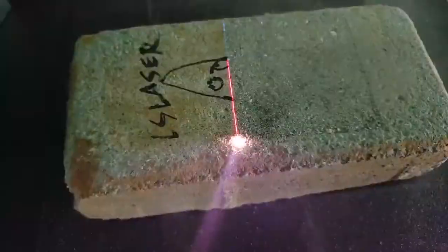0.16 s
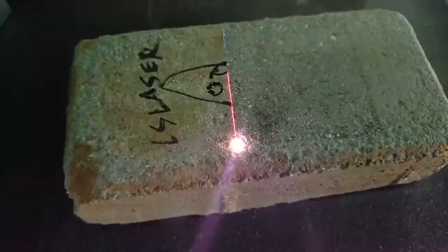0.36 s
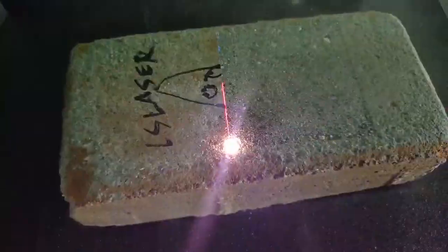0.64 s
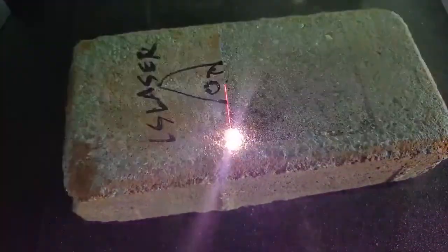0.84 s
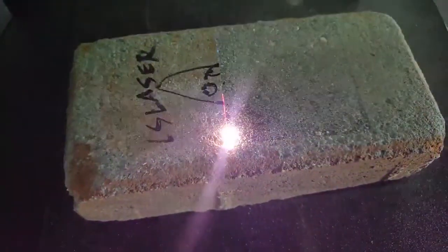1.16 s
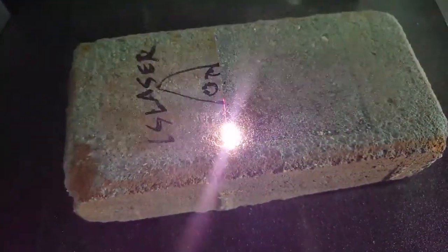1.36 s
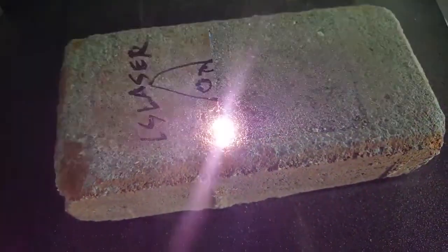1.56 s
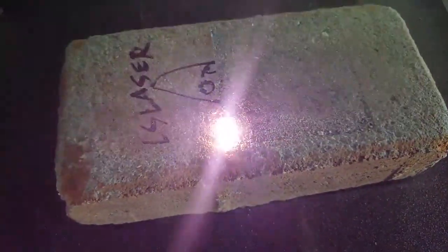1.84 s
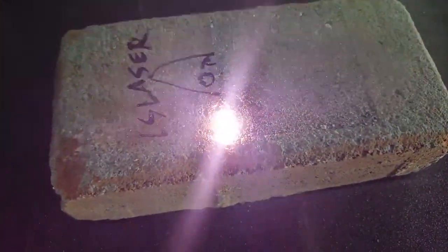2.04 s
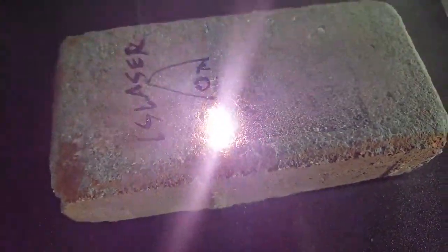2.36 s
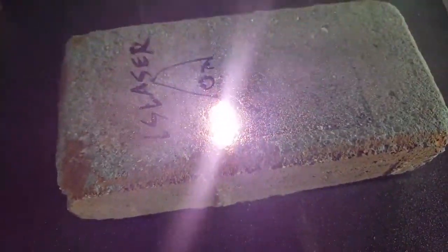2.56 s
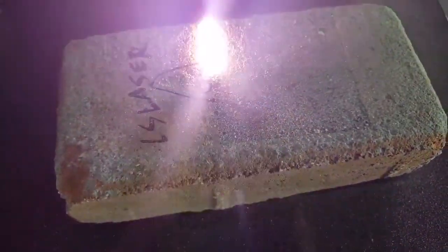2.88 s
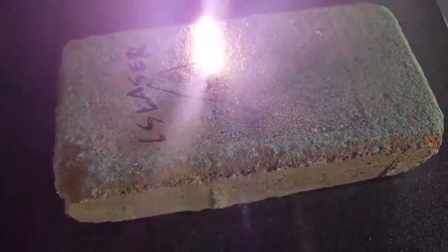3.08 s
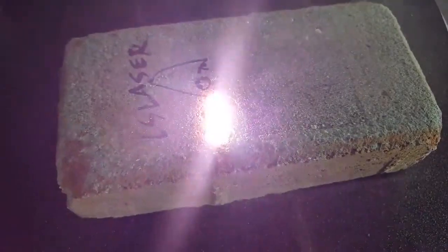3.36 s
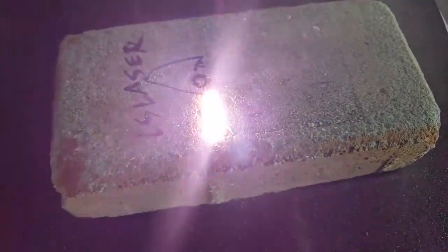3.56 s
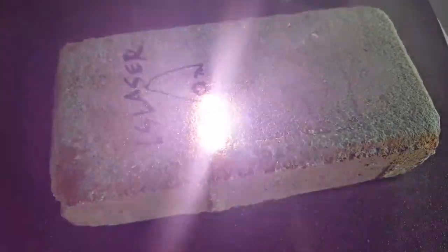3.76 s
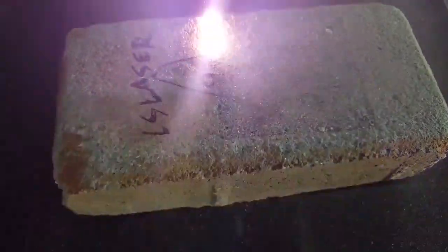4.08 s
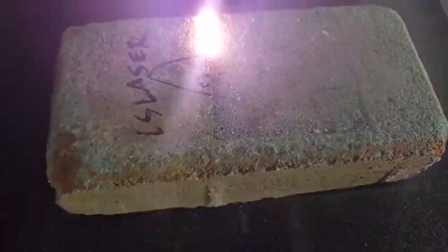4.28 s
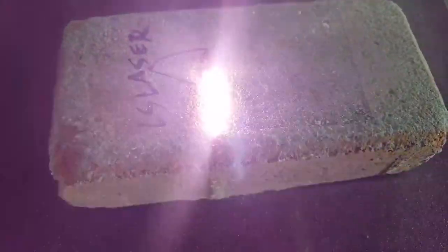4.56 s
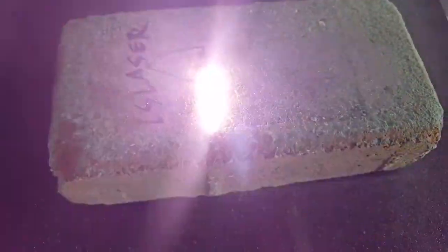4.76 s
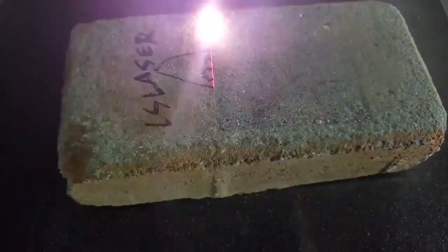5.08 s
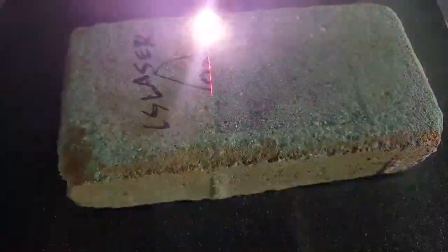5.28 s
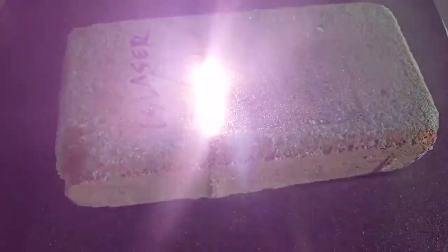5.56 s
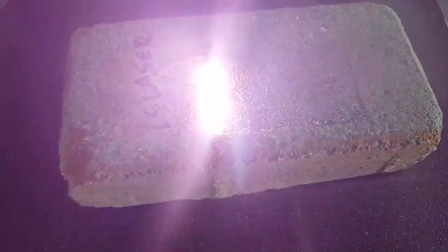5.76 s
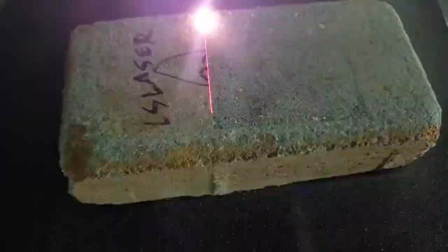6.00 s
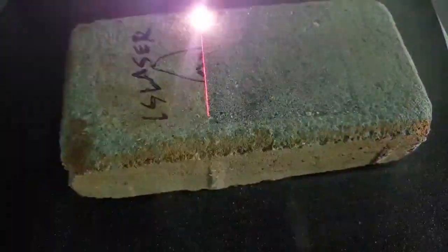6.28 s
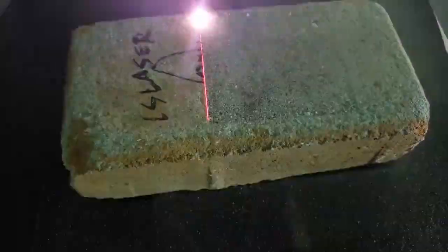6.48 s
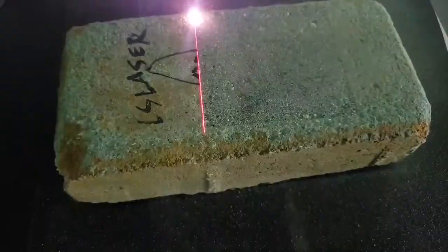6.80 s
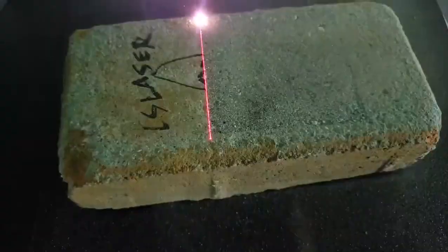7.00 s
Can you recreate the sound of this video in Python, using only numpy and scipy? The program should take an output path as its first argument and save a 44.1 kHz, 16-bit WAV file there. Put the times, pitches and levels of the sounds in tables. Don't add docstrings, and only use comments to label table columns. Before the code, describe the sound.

A continuous fluttering electric rasp of laser cleaning on stone, recorded close in stereo in a small, fairly dry room. Each rapid burst fizzes with sharp high pops, then cuts off briefly before the next, with similar grain repeating. Level stays nearly even while brightness drifts. Underneath lie soft fan hum, low rumble and dull ticks at left, plus barely audible distant metal and a brief drag in the first seconds.

```python
import sys
import numpy as np
from scipy import signal
from scipy.fft import rfft, irfft, next_fast_len
from scipy.io import wavfile
from scipy.ndimage import uniform_filter1d, map_coordinates

SR = 44100
rng = np.random.default_rng(int(sys.argv[2]) if len(sys.argv) > 2 else 0)


def digitize_waveform(pressure):
    field = np.atleast_2d(pressure).T
    bounded = np.clip(field, -1, 1)
    quanta = np.round(bounded * 32767).astype(np.int16)
    wavfile.write(sys.argv[1], SR, quanta)


def invert_db(level):
    return 10 ** (np.asarray(level, dtype=float) / 20)


N = 314874
SWEEP_HZ, FIRST_S, LIT_S = 15.0243, .0496, .0400


def unit(x):
    return x / np.sqrt(np.mean(x ** 2) + 1e-20)


def along(points, hz):
    f, v = np.transpose(points)
    return np.interp(np.log(hz + 1), np.log(f + 1), v)


def curves(rows, at):
    s, *cols = np.transpose(rows)
    return [np.interp(at, s, c) for c in cols]


def filtered(x, response):
    m = next_fast_len(N + 8192, True)
    return irfft(rfft(x, m) * response(np.fft.rfftfreq(m, 1 / SR)), m)[..., :N]


def band(lo_hz, hi_hz):
    return lambda hz: 1 / np.sqrt((1 + (lo_hz / (hz + 1)) ** 4) * (1 + (hz / hi_hz) ** 4))


def resonance(centre_hz, width_hz):
    return lambda hz: 1 / (1 + ((hz - centre_hz) / width_hz) ** 2)


def pair(response, alike):
    white = rfft(rng.standard_normal((2, next_fast_len(N, True))))
    a, b = irfft(white * response(np.linspace(0, SR / 2, white.shape[1])))[:, :N]
    turn = np.arccos(alike) / 2
    shared, apart = np.cos(turn) * a, np.sin(turn) * b
    return unit(np.array([shared + apart, shared - apart]))


def wander(per_s):
    return unit(np.interp(np.arange(N) * per_s / SR, np.arange(400), rng.standard_normal(400)))


def remembered(memory, smooth):
    shape = int(N / SR * SWEEP_HZ) + 32, int(SR / SWEEP_HZ) + 2
    rows = uniform_filter1d(rng.standard_normal(shape), smooth, axis=1)
    return unit(signal.lfilter([1], [1, -memory], rows, axis=0)[30:])


def diffuse(x, t60, gain, delay_s):
    hz, _, z = signal.stft(np.pad(x, (round(delay_s * SR), 0))[:N], SR, nperseg=64)
    keep = invert_db(-120 * 32 / SR / t60(hz))
    power = uniform_filter1d(uniform_filter1d(np.abs(z) ** 2, size=5, axis=0), size=3, axis=1)
    power = np.array([signal.lfilter([1 - k], [1, -k], row) for k, row in zip(keep, power)])
    noise = signal.stft(rng.standard_normal((2, N)), SR, nperseg=64)[2]
    noise = noise / np.sqrt(np.mean(np.abs(noise) ** 2))
    tail = noise * np.sqrt(np.abs(power)) * gain(hz)[:, None]
    return signal.istft(tail, SR, nperseg=64)[1][:, :N]


# start_s, ablation level_db, bareness of the stone (-1 to 1)
STONE = [(0, -23, -0.51), (.4, -25, 0.12), (.75, -21.5, -0.85), (1.1, -24, 0.26), (1.45, -21.5, -1),
         (1.8, -24, -.1), (2.3, -25, 0.14), (2.9, -24, -0.066), (3.1, -24, -0.062), (3.6, -23.5, -0.049),
         (4.0, -23, -.5), (4.3, -24, .5), (4.6, -23, 0.24), (5.3, -23, 0.055), (5.8, -24.5, 0.71),
         (6.2, -23.5, 0.66), (6.75, -23, 0.3), (7.14, -24, 0.21)]
# place (share of the sweep 0-1), level_db, extra body_db, right port lag (samples)
SWEEP_LINE = [(0, -7, 13, 19), (.04, 1, 4, 1.43), (.3, 2.5, 3.5, 3.1), (.7, 1.5, 0, 2.3), (1, 0, 1, 4.4)]
# pitch_hz, share (0-1)
GRAIN_SHARE = [(400, 0.99), (2000, 0.93), (4000, 1), (7000, 0.67), (12000, 0)]


def laser():
    t = np.arange(N) / SR
    turns = (t - FIRST_S) * SWEEP_HZ + 1
    sweep, since_s = turns.astype(int), turns % 1 / SWEEP_HZ
    place = since_s / LIT_S
    level_db, body_db, lag = curves(SWEEP_LINE, place)
    ablation_db, bare = curves(STONE, t)

    def on_line(rows):
        return map_coordinates(rows, [sweep, since_s * SR])

    def share(hz):
        return np.clip(along(GRAIN_SHARE, hz), 0, 1)

    grain = filtered(on_line(remembered(0.917, smooth=1)), lambda hz: np.sqrt(share(hz)))
    pops = grain + filtered(rng.standard_normal(N), lambda hz: np.sqrt(1 - share(hz)))

    def tone_swing(bare_db):
        db = bare_db * bare + 0.67 * wander(per_s=5.5)
        return db - db.mean()

    def swing(db, part):
        return filtered(pops, part) * (invert_db(db) - 1)

    sag_db = 6 * np.clip((place - 0.83) / (1 - 0.83), 0, 1)
    fizz = swing(tone_swing(3) - sag_db, lambda hz: 1 / (1 + (8000 / (hz + 1)) ** 6))
    body = swing(tone_swing(2.5) + body_db, lambda hz: 1 / (1 + (hz / 1200) ** 6))
    hollow = swing(tone_swing(1), lambda hz: np.exp(-((hz - 2000) / 500) ** 2))

    lit = np.clip(since_s / .001, 0, 1) * np.clip((LIT_S - since_s) / .001 + 1, 0, 1)
    spots_db = 0.87 * on_line(remembered(0.57, smooth=60))
    sweep_db = 0.35 * rng.standard_normal(sweep[-1] + 1)[sweep]
    return (pops + fizz + body + hollow) * lit * invert_db(level_db + spots_db + sweep_db + ablation_db), lag


# pitch_hz, level_db per Hz
LEFT_COLOUR = [(110, -30.5), (350, -19.0), (890, -16.0), (2010, -7.5), (2540, -5.0), (4650, -2.0),
               (6690, -7.5), (6780, -9.5), (8700, -11.0), (9310, -7.0), (10760, -8.5), (11230, 2.0),
               (13010, -7.5), (15740, -12.0)]
RIGHT_COLOUR = [(110, -38.0), (430, -17.5), (1070, -19.0), (2140, -6.5), (5160, -5.5), (5810, -10.5),
                (6890, -15.5), (8740, -18.5), (8930, -12.5), (10320, -17.5), (11320, -1.5), (11930, -4.0),
                (13090, -14.5), (15650, -21.0)]
# pitch_hz, width_hz, level_db
PEAKS_AND_NOTCHES = [(1000, 250, -1), (2000, 70, 2), (2270, 120, -2), (7200, 1300, 2.5), (9900, 500, 1),
                     (10550, 200, 2), (12300, 500, 1), (14800, 900, 1.5), (2550, 130, 2), (3150, 150, -2),
                     (3640, 150, 4), (4080, 120, -4), (4600, 180, 2), (6000, 100, -1.5), (6400, 150, 1.5),
                     (6900, 90, -3.5), (8650, 80, -2), (10200, 130, -3), (13060, 90, -3), (13450, 160, 2.5),
                     (15230, 100, -2), (15650, 120, 3)]
# pitch_hz, level_db against the direct pops
BENCH = [(300, -7), (1500, -13), (3000, -8), (5000, -6), (8000, -3), (11500, -6), (14000, -1)]
# pitch_hz, t60_s
ROOM_DECAY = [(500, 0.2), (1500, 0.1), (4000, 0.11), (9000, 0.079), (15000, 0.04)]
# pitch_hz, level_db
ROOM_LEVEL = [(700, -5.5), (1500, -10), (3000, -5), (5000, -6.5), (8000, 0), (10400, 0.5), (11600, -12),
              (15000, 4)]


def ports(spot, lag):
    direct = np.array([spot, map_coordinates(spot, [np.arange(N) - lag], order=5)])
    bench = diffuse(spot, lambda hz: 0.027 + 0 * hz, lambda hz: invert_db(along(BENCH, hz)), delay_s=0.00017)
    walls = diffuse(spot, lambda hz: along(ROOM_DECAY, hz), lambda hz: invert_db(along(ROOM_LEVEL, hz)),
                    delay_s=0.00313)

    def ripple(hz):
        return invert_db(sum(db * np.exp(-.5 * ((hz - c) / w) ** 2) for c, w, db in PEAKS_AND_NOTCHES))

    def thin(hz):
        return 1 / np.sqrt((1 + invert_db(2 * along(BENCH, hz))) * (1 + (330 / (hz + 1)) ** 6))

    def colour(hz):
        ring = np.exp(-.5 * ((hz - 11150) / 350) ** 2)
        twist = np.exp(1j * np.array([[0], [1.1]]) * ring)
        return invert_db(np.array([along(LEFT_COLOUR, hz), along(RIGHT_COLOUR, hz)])) * thin(hz) * twist

    return invert_db(11.5) * filtered(filtered(direct + bench, ripple) + walls, colour)


# pitch_hz, level_db per Hz
FAN_AIR = [(25, -44), (60, -68), (97, -4), (130, 8), (250, 4), (330, 15), (600, 14.5), (1100, -31),
           (3000, -9), (8000, -108.5), (11500, 21.5), (16000, 13.5)]
# start_s, blade tone level_db, rumble level_db
FAN_HUM = [(0, -55, -47), (.9, -79, -59), (1.8, -62, -66), (2.6, -75, -60), (3.5, -65, -60),
           (4.5, -59, -54), (5.0, -62, -72), (5.08, -53.5, -48), (5.8, -53.5, -54), (6.3, -57.5, -57),
           (7.14, -76, -57)]


def fan():
    tone_db, rumble_db = curves(FAN_HUM, np.arange(N) / SR)

    def puffs(db):
        return invert_db(db + 1.5 * wander(per_s=6))

    air = invert_db(-36.5) * pair(lambda hz: invert_db(along(FAN_AIR, hz)), alike=0.2) * invert_db([[1], [-1]])
    tone = puffs(tone_db + 5.5) * pair(resonance(centre_hz=435, width_hz=11), alike=0.87)
    rumble = puffs(rumble_db - 10) * pair(band(lo_hz=40, hi_hz=76), alike=0.42)
    motor = puffs(-67.5) * pair(resonance(centre_hz=99, width_hz=6), alike=0.65)
    return air + tone + rumble + motor


# start_s, peak level_db
STRONG_TICKS = [(0.118, -36), (0.652, -39), (1.049, -38), (2.393, -38), (3.318, -36), (3.515, -37),
                (4.114, -31), (4.25, -42), (4.446, -36), (4.579, -36), (4.657, -35), (4.977, -34),
                (5.513, -33), (5.712, -36), (5.778, -36), (6.184, -40), (6.856, -36), (7.12, -34)]


def thumps():
    chance = rng.standard_normal((int((N / SR - FIRST_S) * SWEEP_HZ), 2))
    weak_s = FIRST_S + .002 + np.arange(len(chance)) / SWEEP_HZ
    weak_db = -41.5 - 0.5 * np.abs(chance[:, 0])
    strong_s, strong_db = np.transpose(STRONG_TICKS)
    s, db = np.append(weak_s, strong_s), np.append(weak_db, strong_db)
    sign = np.sign(np.resize(chance[:, 1], len(s)))
    pushes = np.bincount(np.round(s * SR).astype(int), invert_db(db + 36) * sign, N)
    return filtered(pushes, band(lo_hz=30, hi_hz=800)) * invert_db([[0], [-20]])


# start_s, pitch_hz, level_db, t60_s
METAL_RINGS = [
    (.47, 905, -37.5, 1),
    (1.6, 870, -41.5, 1),
    (2.22, 615, -41, 1),
]


def far_metal():
    t = np.arange(N) / SR
    metal = np.zeros(N)
    for start_s, hz, db, t60_s in METAL_RINGS:
        age = np.clip(t - start_s, 0, None)
        swell = 1 - np.exp(-age / 0.058)
        damped = np.clip((.24 - age) / 0.043, 0, 1)
        metal += invert_db(db - 60 * age / t60_s) * swell * damped * np.sin(2 * np.pi * hz * age)
    return metal


def floor_drag():
    start_s, rise_s, hold_s, fade_db_per_s = 1.14, .07, .07, 120
    age = np.arange(N) / SR - start_s
    fade = invert_db(-fade_db_per_s * np.clip(age - rise_s - hold_s, 0, 1))
    stroke = np.clip(age / rise_s, 0, 1) * fade
    return invert_db(-45) * stroke * pair(band(lo_hz=150, hi_hz=414), alike=0.79) * invert_db([[1], [-1]])


def scene():
    return ports(*laser()) + fan() + thumps() + far_metal() + floor_drag()


def starved(x, floor_db, scatter_db, depth_db, sharpen):
    hz, _, z = signal.stft(x, SR, nperseg=1024)
    power = np.abs(z) ** 2 + 1e-14
    bands = np.abs(uniform_filter1d(power, size=11, axis=1)) + 1e-14
    masking = power.mean(axis=(0, 1)) ** .7
    above_db = 10 * np.log10(bands.mean(axis=0) / masking)
    luck = uniform_filter1d(rng.standard_normal(z.shape[1:]), size=7, axis=0)
    luck = unit(uniform_filter1d(luck, size=3, axis=1))
    short = np.clip((floor_db - above_db - scatter_db * luck) / 2, 0, 1) * (hz > 2900)[:, None]
    gain = invert_db(-depth_db * short) * (power / bands) ** (sharpen * (hz > 1200)[:, None])
    return signal.istft(z * gain, SR, nperseg=1024)[1][:, :N]


FULL_HUSHES = [.383, 1.515, 3.112, 5.375, 5.908, 7.039]


def hushed(x):
    from_s, to_s, depth_db, odds = .009, .003, 45, .27
    hz, t, z = signal.stft(x, SR, nperseg=128)
    turns = (t - FIRST_S) * SWEEP_HZ
    coming, ahead_s = np.ceil(turns).astype(int), -turns % 1 / SWEEP_HZ
    bursts = coming[-1] + 1
    luck = unit(uniform_filter1d(rng.standard_normal((len(hz), bursts)), size=5, axis=0))
    need = np.log(odds) + rng.exponential(1, bursts) + (hz[:, None] / 16000) ** 2
    need[:, np.round((np.array(FULL_HUSHES) - FIRST_S) * SWEEP_HZ).astype(int)] = 9
    empty = np.clip(need + luck, 0, 1)[:, coming]
    from_s = from_s + .016 * (hz > 14500)[:, None]
    inside = np.clip(np.minimum(from_s - ahead_s, ahead_s - to_s) / 0.0011, 0, 1)
    return signal.istft(z * invert_db(-depth_db * empty * inside), SR, nperseg=128)[1][:, :N]


def band_limit(x):
    return signal.sosfilt(signal.butter(12, 16820, fs=SR, output="sos"), x)


def record(dry):
    top_hz = 15760
    limited = filtered(dry, lambda hz: np.where(hz < top_hz, 1, invert_db(-20 - (hz - top_hz) / 80)))
    thinned = starved(limited, floor_db=-20.5, scatter_db=7, depth_db=30, sharpen=.22)
    mix = hushed(thinned)
    return band_limit(mix)


dry = scene()
out = record(dry)
digitize_waveform(out)
```